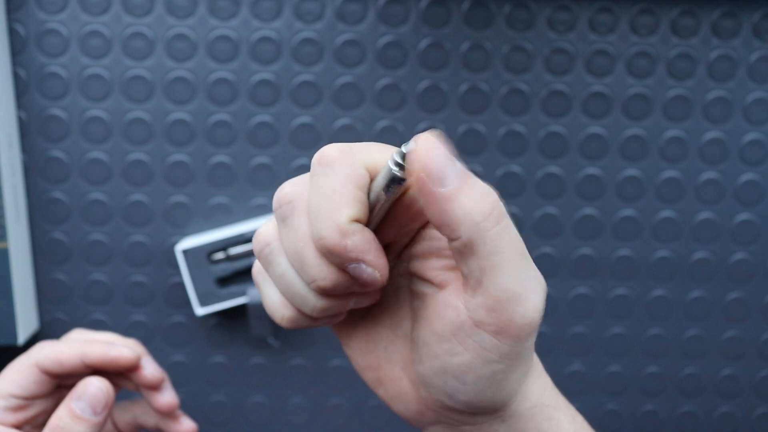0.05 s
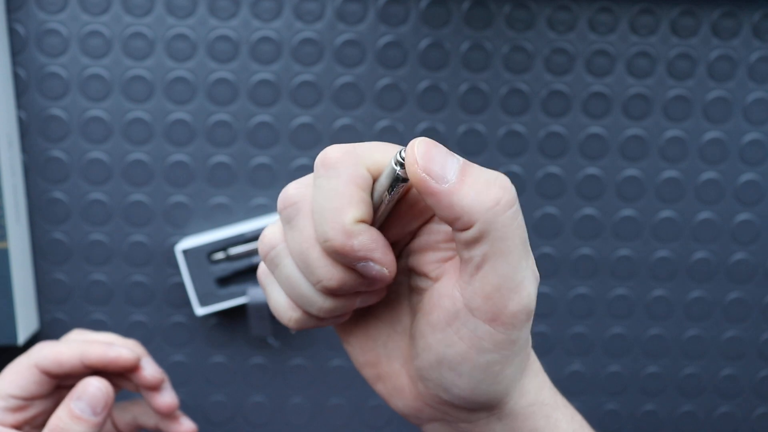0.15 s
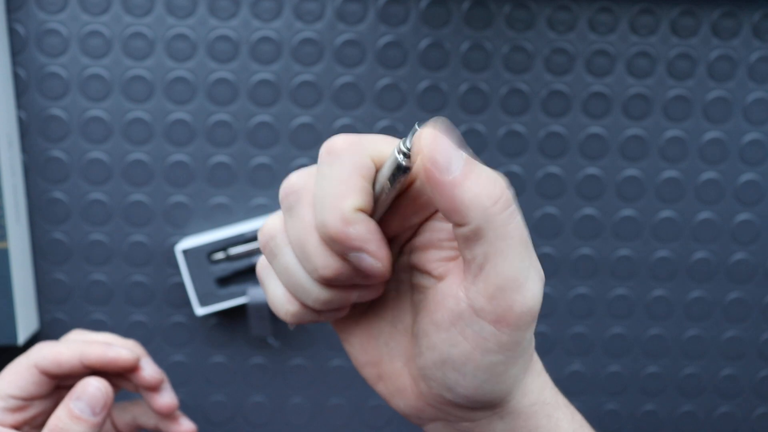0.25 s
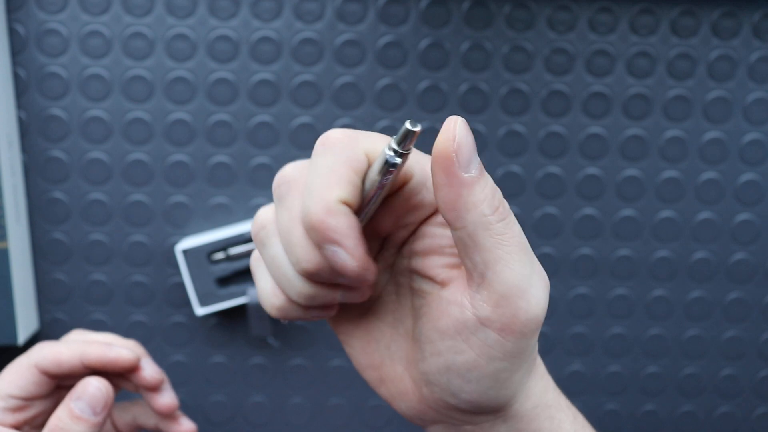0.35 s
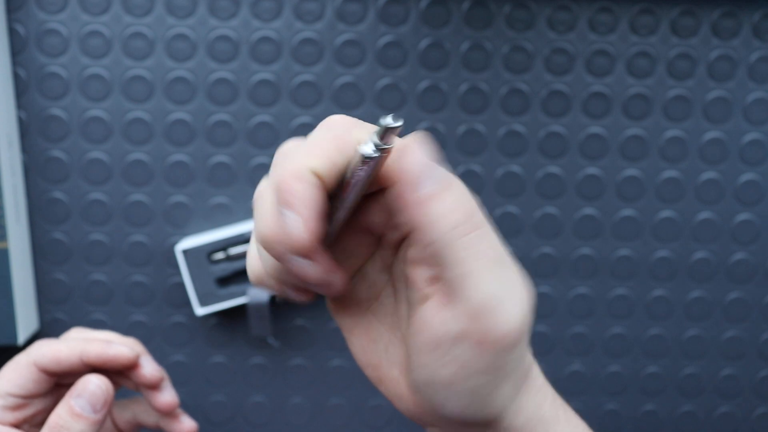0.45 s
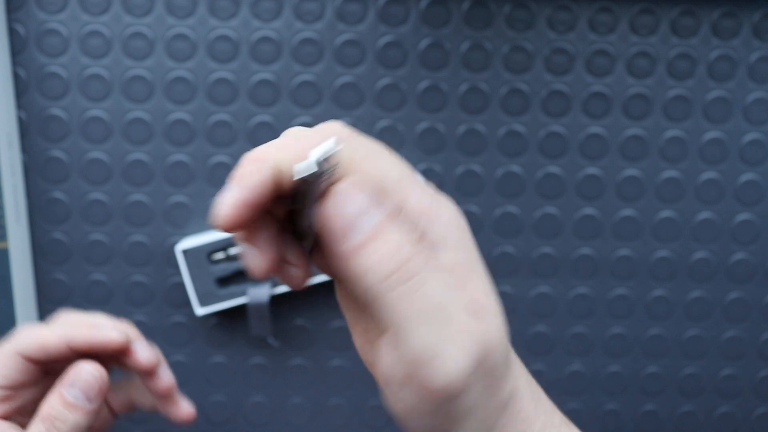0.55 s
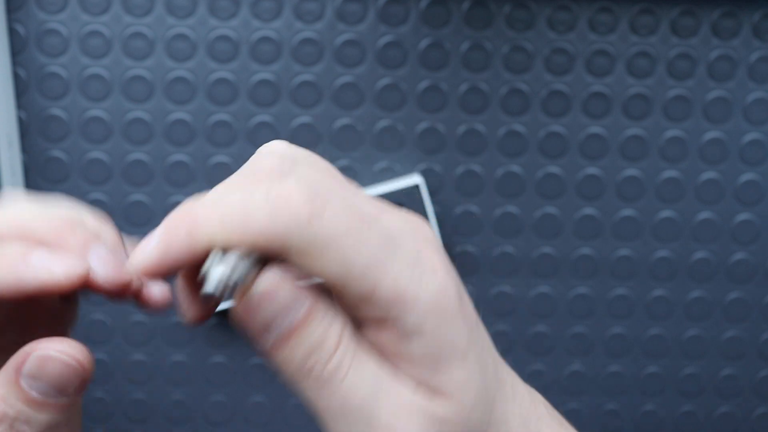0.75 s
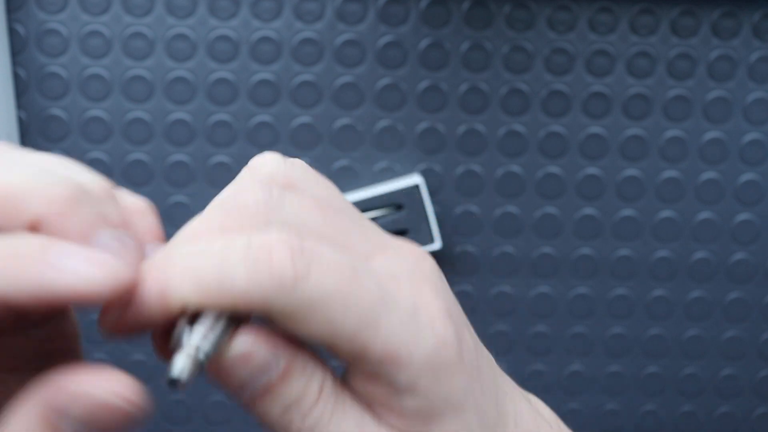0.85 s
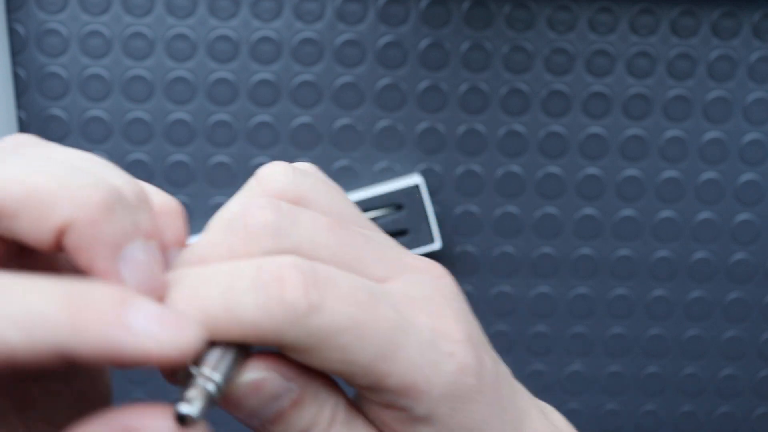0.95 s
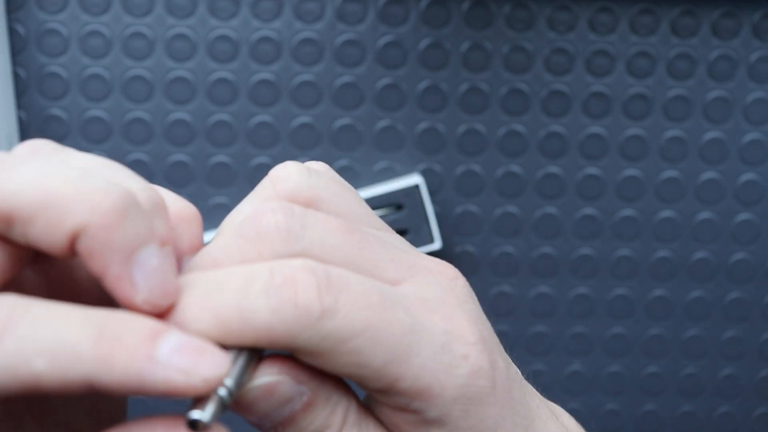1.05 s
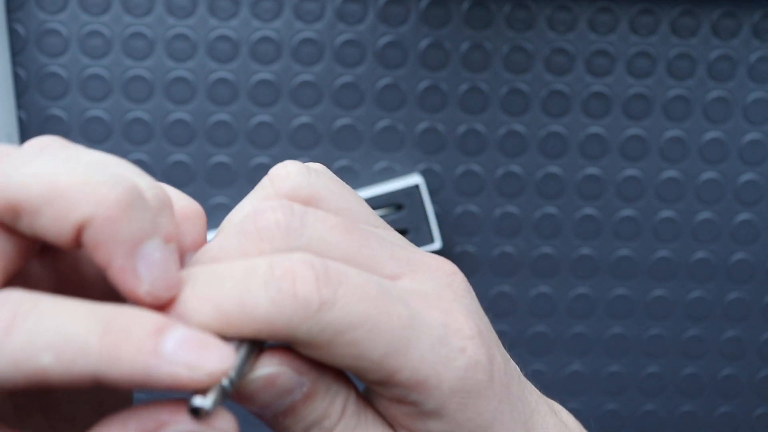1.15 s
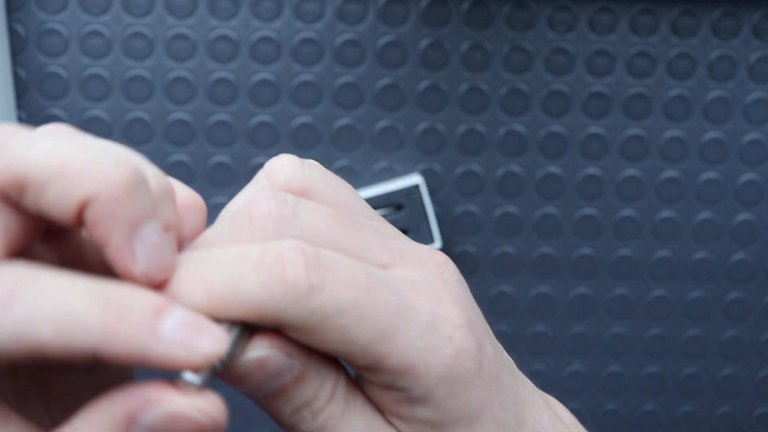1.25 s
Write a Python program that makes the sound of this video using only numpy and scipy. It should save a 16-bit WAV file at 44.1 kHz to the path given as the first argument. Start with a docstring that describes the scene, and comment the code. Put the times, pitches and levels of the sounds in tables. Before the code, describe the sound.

A pen's button clicks down, then snaps back louder, close by in a quiet room.

```python
"""A metal push-button pen is clicked close to the microphone, above a desk in a quiet room.
At first the room still rings from a click just before, over a low ventilation rumble.
The loose button ticks, the plunger scrapes down, and the thumb loads the spring with a soft bump.
At 0.23 s the cam (the catch inside) snaps over; at 0.36 s, on release, it snaps back harder.
Each snap is a few contacts within milliseconds that make the barrel ring briefly."""
import sys
import numpy as np
from scipy import signal
from scipy.fft import rfft, irfft
from scipy.io import wavfile
from scipy.ndimage import uniform_filter1d, minimum_filter1d

SR = 44100
rng = np.random.default_rng(int(sys.argv[2]) if len(sys.argv) > 2 else 0)


def put_to_file(sound):
    """Save the sound as 16-bit audio at rate SR, in the file named by the first command-line argument."""
    columns = np.atleast_2d(sound).T  # one column per channel
    safe = np.clip(columns, -1, 1)
    whole_steps = np.round(safe * 32767)
    wavfile.write(sys.argv[1], SR, whole_steps.astype(np.int16))


N = 57330
LEAD_S = .1  # extra time before the start, to hold the earlier click
TIME_S = np.arange(-int(LEAD_S * SR), N) / SR
SAMPLES = len(TIME_S)
AGE_S = np.arange(SAMPLES) / SR
HZ = np.maximum(np.fft.rfftfreq(SAMPLES, 1 / SR), 1)
LEFT_RIGHT = np.array([[1], [-1]])


def amp(db):
    """Turn decibels into a gain to multiply by."""
    return 10 ** (np.asarray(db) / 20)


def unit(x):
    """Scale a sound to an average (rms) level of 1."""
    return x / np.sqrt(np.mean(x ** 2))


def tone_gain(tone):
    """Join rows of (pitch_hz, level_db) into a gain for every pitch."""
    pitch_hz, level_db = np.array(tone).T
    return amp(np.interp(np.log(HZ), np.log(pitch_hz), level_db))


def shape(x, gain):
    """Turn each pitch in a sound up or down by its gain."""
    return irfft(rfft(x) * gain, SAMPLES)


def noise(tone):
    """Two unrelated channels of noise with the given tone."""
    return unit(shape(rng.standard_normal((2, SAMPLES)), tone_gain(tone)))


def convolve(x, response):
    """Let every sample of a sound set off a copy of the response."""
    return signal.fftconvolve(x, response, axes=-1)[..., :SAMPLES]


def fade(age_s, fade_s):
    """Silent until age 0, then falling by 60 dB every fade_s."""
    return (age_s >= 0) * np.exp(-np.log(1000) * np.maximum(age_s, 0) / fade_s)


# Tone of the ventilation: pitch_hz, relative_db
VENT_TONE = [(15, -36), (25, -4), (47, -3.5), (59, -17), (80, -2), (166, 1), (195, -3.5), (223, -3),
             (354, -9), (416, -9.5), (775, -17.5), (1330, -18), (1940, -19.5), (13600, -31.5), (16000, -32)]
# Its stereo width, as the side signal's level against the middle: pitch_hz, side_db
VENT_WIDTH = [(60, -9), (110, -18.5), (200, -10.5), (380, -6.5), (700, -1.5), (1290, -1.5), (2380, -1),
              (4400, 1), (8120, 0), (15000, 0)]

def ventilation(level_db=-57):
    """Ventilation gives a low rumble and a faint hiss, wider towards the treble."""
    middle, side = noise(VENT_TONE)
    return (middle + shape(side, tone_gain(VENT_WIDTH)) * LEFT_RIGHT) * amp(level_db)


# How long the room rings: pitch_hz, fade_s
ROOM_FADES = [(300, .4), (1500, .42), (3000, .44), (7000, .41), (14000, .32)]
# Tone of the room's echoes: pitch_hz, relative_db
ROOM_TONE = [(200, -10), (1400, 0), (2000, -6.5), (2500, 3.5), (2850, -5), (3200, 0.5), (4200, -1),
             (7500, 1), (11000, 1.5), (15000, -4)]

def room(sound, early_db=-15, tail_db=-15, build_s=.023):
    """Nearby things echo first; then a wash of echoes builds up and dies sooner in the treble."""
    wash = noise(ROOM_TONE)
    log_pitches = np.log([pitch_hz for pitch_hz, _ in ROOM_FADES])
    tail = 0
    for band, (_, fade_s) in zip(np.eye(len(ROOM_FADES)), ROOM_FADES):
        band_gain = np.interp(np.log(HZ), log_pitches, band)
        tail += shape(wash, band_gain) * fade(AGE_S, fade_s)
    tail *= 1 - np.exp(-(AGE_S / build_s) ** 2)
    early = noise(ROOM_TONE) * fade(AGE_S, fade_s=.05)
    echoes = amp(tail_db) * unit(tail) + amp(early_db) * unit(early)
    return convolve(sound, echoes / np.sqrt(SAMPLES))


def desk(sound, delay_s=(.0021, .00105), level_db=(-7, -9)):
    """Sound bounces off the desk and reaches the left and right microphone a moment later."""
    delay = np.exp(-2j * np.pi * HZ * np.array(delay_s)[:, None])
    return shape(sound, amp(level_db)[:, None] * delay)


# Tone of the thumb's bump: pitch_hz, relative_db
THUMB_TONE = [(40, -18), (90, 1), (150, -9), (225, 0), (350, -20), (1000, -50)]

def thumb(peak_s=.202, width_s=.026, level_db=-51):
    """A dull swell as the thumb loads the spring."""
    swell = np.exp(-((TIME_S - peak_s) / width_s) ** 2)
    return noise(THUMB_TONE)[0] * amp(level_db) * swell


def ring(notes, age_s, attack_s=.0005):
    """A struck part rings at its own notes, which take a moment to spread through it."""
    attack = 1 - np.exp(-(age_s / attack_s) ** 2)
    return attack * sum(amp(level_db) * fade(age_s, fade_s) * np.sin(2 * np.pi * pitch_hz * age_s)
                        for pitch_hz, level_db, fade_s in notes)


# Tone of the crack when two parts meet: pitch_hz, relative_db
CRACK_TONE = [(60, -16.5), (400, -15.5), (1000, -11.5), (1700, -18.5), (2200, 0.5), (4000, -3), (7500, 1),
              (10000, -9), (15000, -6.5)]

def contacts(hits, notes, stereo_width=.5):
    """Each hit rings the notes and gives a short crack of noise. Positive pan_db is to the left."""
    sound, crack_gain = 0, unit(tone_gain(CRACK_TONE))
    for start_s, ring_db, crack_db, pan_db in hits:
        age_s = TIME_S - start_s
        middle, side = rng.standard_normal((2, SAMPLES))
        burst = unit(middle + stereo_width * side * LEFT_RIGHT) * fade(age_s, fade_s=.01)
        hit = amp(ring_db) * ring(notes, age_s) + amp(crack_db) * shape(burst, crack_gain)
        sound += hit * amp(pan_db * LEFT_RIGHT / 2)
    return sound


# Notes of the button and plunger: pitch_hz, relative_db, fade_s
BUTTON_NOTES = [(2300, 1, 0.018), (2560, -0.5, 0.044), (3070, -2, 0.032), (4820, -9.5, .009)]
# Light taps of the button: start_s, ring_db, crack_db, pan_db
BUTTON_HITS = [(0.118, -32, -29, 3), (0.1468, -46, -59.5, 3), (0.1603, -33.5, -47.5, 4.5),
               (0.1893, -47.5, -45.5, 2), (0.3305, -40, -64.5, 6.5)]

def button_ticks():
    """The loose button ticks lightly as it moves."""
    return contacts(BUTTON_HITS, BUTTON_NOTES)


# Loudness of the plunger's scrape: time_s, level_db
SCRAPE_LEVELS = [(0.123, -53), (0.138, -47), (0.149, -38), (0.161, -37.5), (0.171, -57.5), (0.194, -53.5),
                 (0.224, -54.5)]

def plunger_scrape(catches_per_s=2000, hiss_db=-5.5, pan_db=3):
    """The sliding plunger sticks and slips; each tiny catch makes it ring and hiss."""
    catches = (rng.random(SAMPLES) < catches_per_s / SR) * rng.standard_normal(SAMPLES)
    ringing = unit(convolve(catches, ring(BUTTON_NOTES, AGE_S)))
    tiny_crack = noise(CRACK_TONE) * fade(AGE_S, fade_s=.0013)
    hiss = unit(convolve(catches[None], tiny_crack))
    time_s, level_db = np.array(SCRAPE_LEVELS).T
    scrape_db = np.interp(TIME_S, time_s, level_db, left=-120, right=-120)
    return (ringing + amp(hiss_db) * hiss) * amp(scrape_db + pan_db * LEFT_RIGHT / 2)


# Notes of the barrel with the spring squeezed: pitch_hz, relative_db, fade_s
PRESS_NOTES = [(450, -31, .012), (1100, -27, .012), (2020, -12, .018), (2350, -4.5, .021), (2406, -35, .35),
               (2780, -1.5, .023), (3240, -.5, .023), (3273, -34, .25), (3950, -15, .018), (4540, -9, .018),
               (5970, -5, .016), (6920, 1, .02), (7074, -27, .26), (10400, -17, .016)]
# Contacts as the button goes down: start_s, ring_db, crack_db, pan_db
PRESS_HITS = [(0.2286, -29, -31, 0), (0.2305, -19, -27, 0), (0.2317, -19, -18, -1), (0.2325, -13.5, -12, 0),
              (0.2438, -48, -34, 0)]

def press_snap():
    """The cam snaps over and rings the barrel."""
    return contacts(PRESS_HITS, PRESS_NOTES)


# Notes of the barrel as the plunger hits its stop: pitch_hz, relative_db, fade_s
RELEASE_NOTES = [(620, -27, .012), (920, -25, .012), (1300, -28, .012), (2430, -17, .016), (2800, 0, .016),
                 (2960, -5, .013), (3250, -20, .02), (4436, -23, .016), (4930, -23, .016),
                 (5440, -20, .018), (5780, -25, .018), (6620, -21, .02), (7120, -15, .02),
                 (7870, -17, .016)]
# Contacts as the button springs back (row one is the earlier click): start_s, ring_db, crack_db, pan_db
RELEASE_HITS = [(-0.05, -5, -4, -1), (0.3559, -23.5, -28, 2.5), (0.3592, -32, -18.5, -2),
                (0.36025, 2.5, -8, -0.5), (0.3629, -28, -11, 0.5), (0.3652, -31.5, -17, 0.5),
                (0.3698, -16, -37, 1.5)]

def release_snap():
    """The spring throws the plunger against its stop: the loudest snap."""
    return contacts(RELEASE_HITS, RELEASE_NOTES)


def scene(treble_hz=10500, treble_pan_db=-6.5):
    """The pen, its echoes and the background; up close, the highest treble leans to the right."""
    pen = press_snap() + release_snap() + button_ticks() + plunger_scrape()
    pan_db = treble_pan_db / (1 + (treble_hz / HZ) ** 10)
    near = shape(pen + desk(pen), amp(pan_db * LEFT_RIGHT / 2))
    return (near + room(pen) + thumb() + ventilation())[:, -N:]


def record(dry, top_hz=15900, recovery_db_per_s=900):
    """Cut the highest treble; a fast limiter then turns down peaks above full scale and recovers."""
    treble_cut = signal.ellip(10, .2, 70, top_hz, fs=SR, output="sos")
    sound = signal.sosfilt(treble_cut, dry)
    excess_db = 20 * np.log10(np.maximum(np.abs(sound).max(axis=0), 1))
    needed_db = minimum_filter1d(-excess_db, size=15)
    recovery_db = recovery_db_per_s * np.arange(N) / SR
    # the gain drops at once, then climbs back steadily
    gain_db = np.minimum.accumulate(needed_db - recovery_db) + recovery_db
    return sound * amp(uniform_filter1d(gain_db, size=15))


dry = scene()
out = record(dry)
put_to_file(out)
```